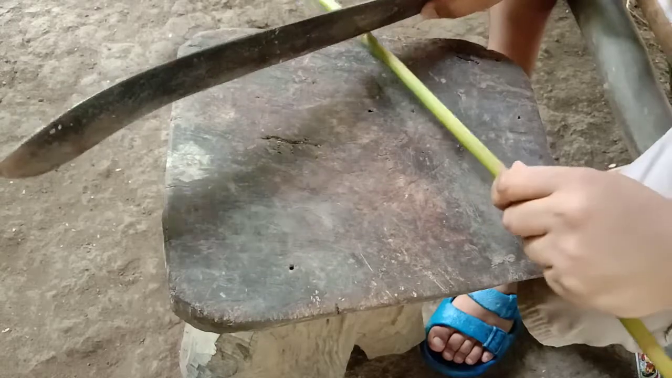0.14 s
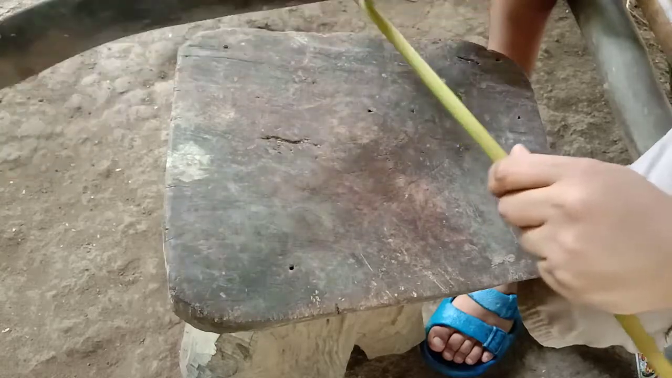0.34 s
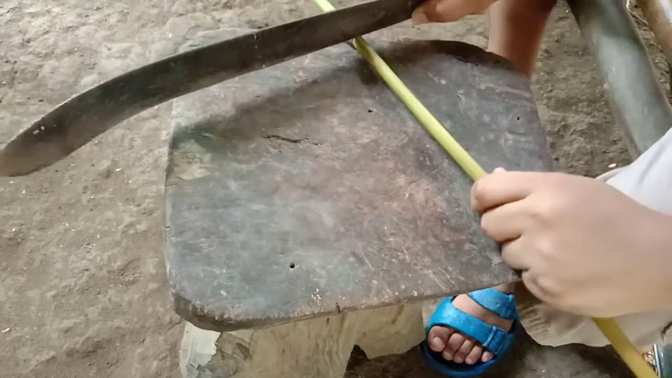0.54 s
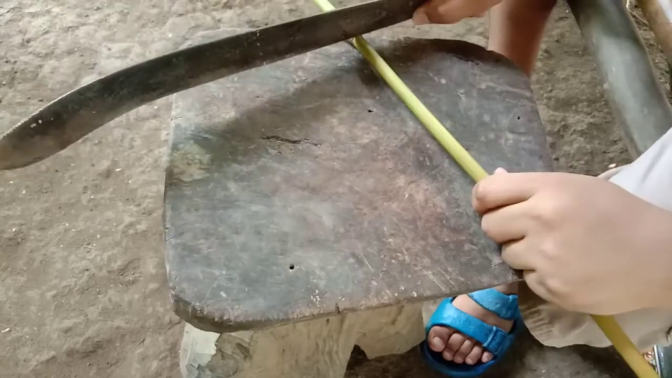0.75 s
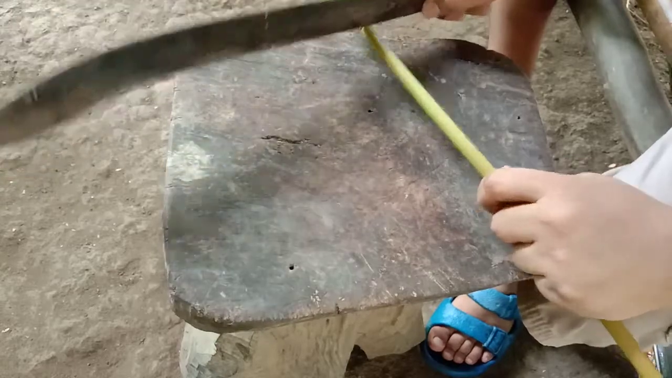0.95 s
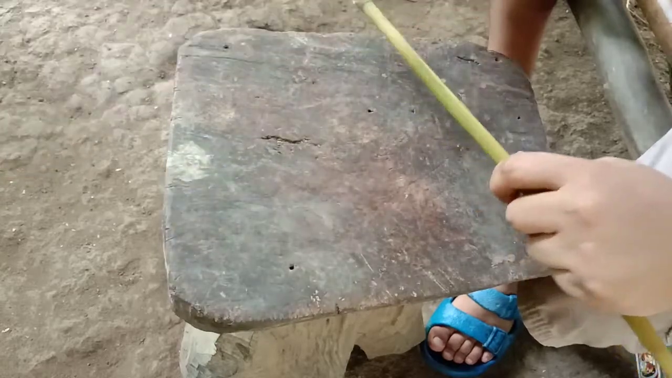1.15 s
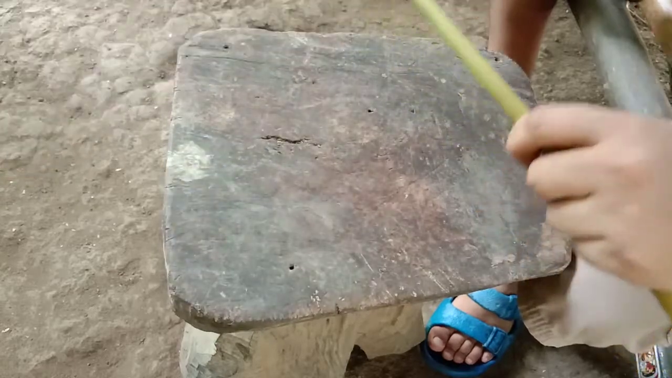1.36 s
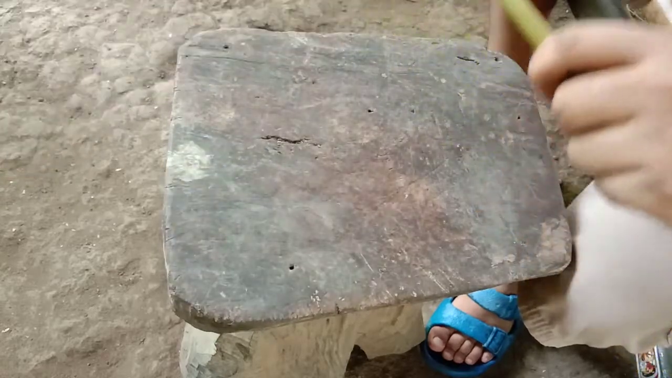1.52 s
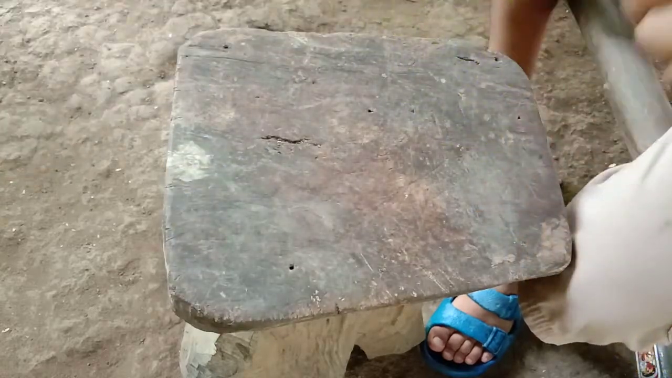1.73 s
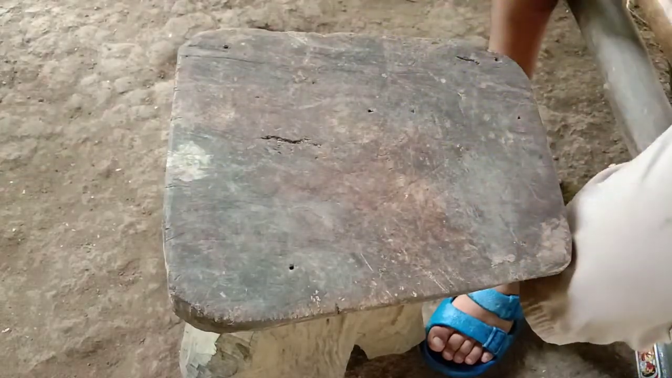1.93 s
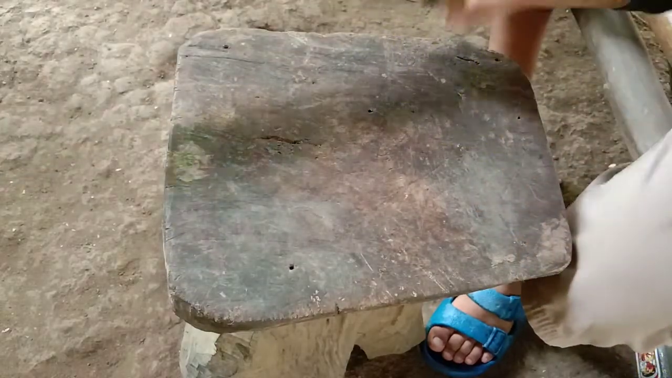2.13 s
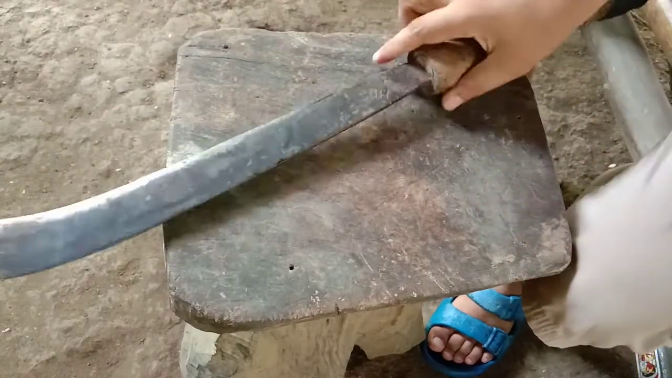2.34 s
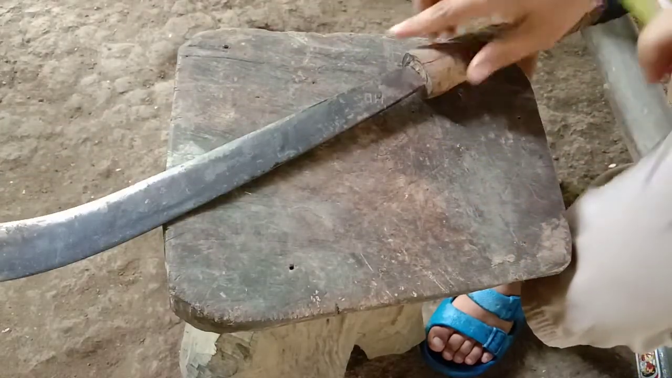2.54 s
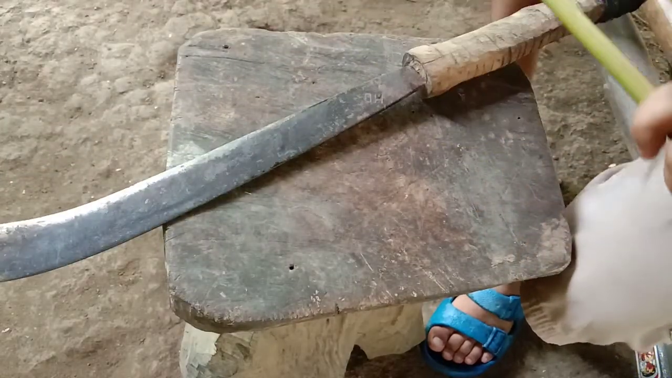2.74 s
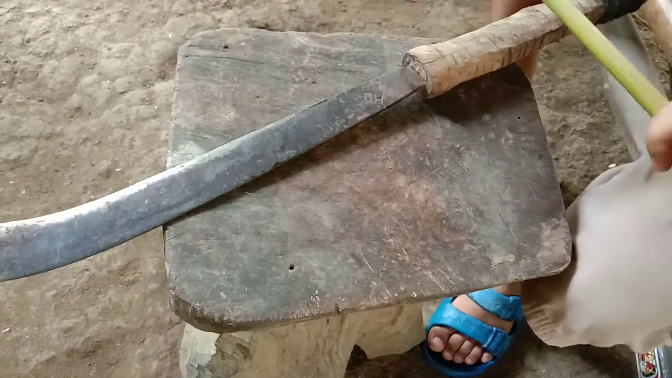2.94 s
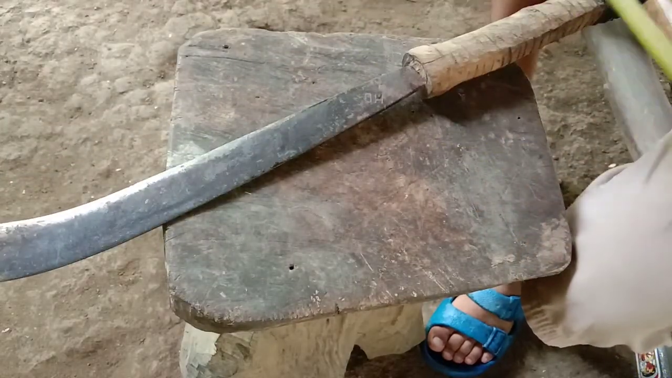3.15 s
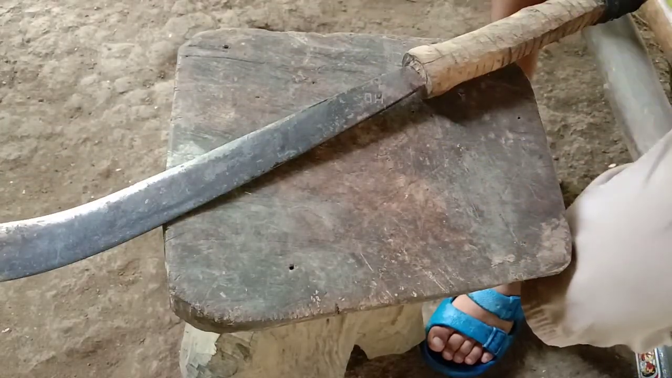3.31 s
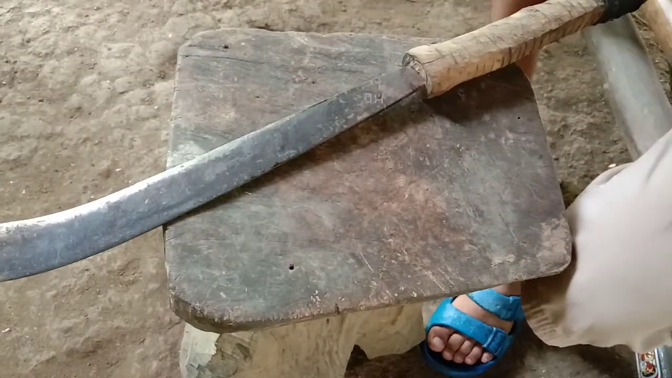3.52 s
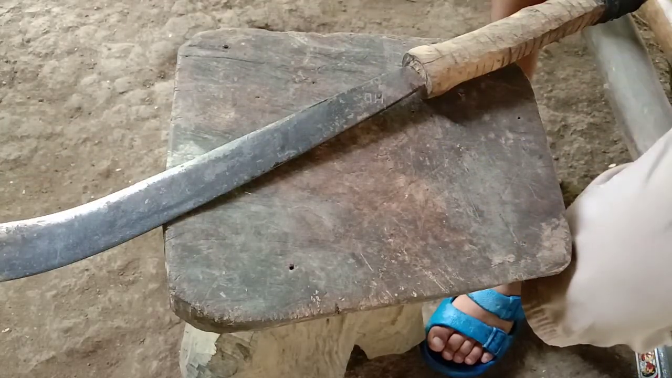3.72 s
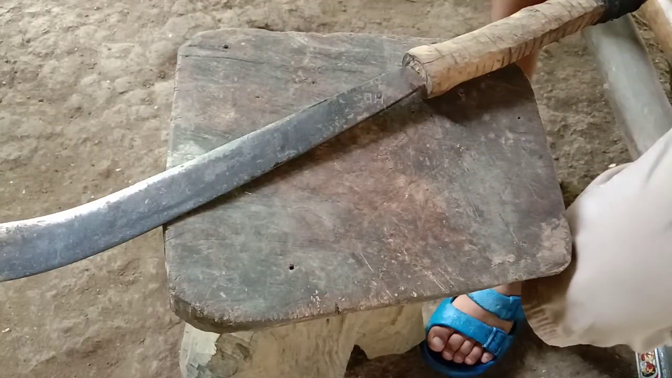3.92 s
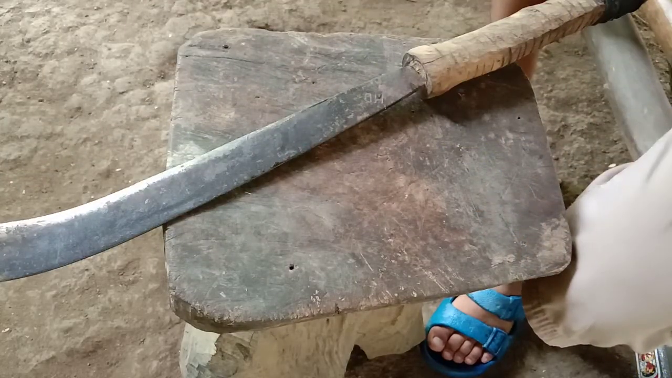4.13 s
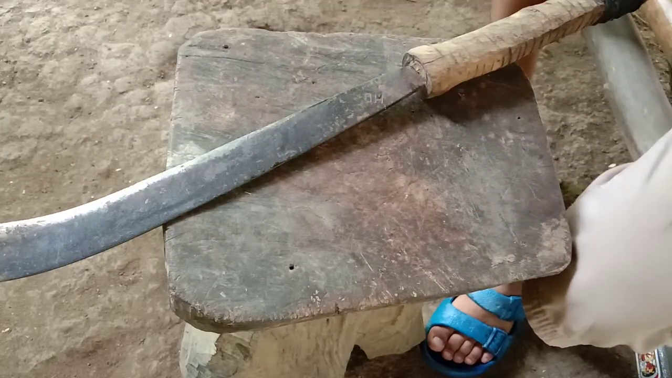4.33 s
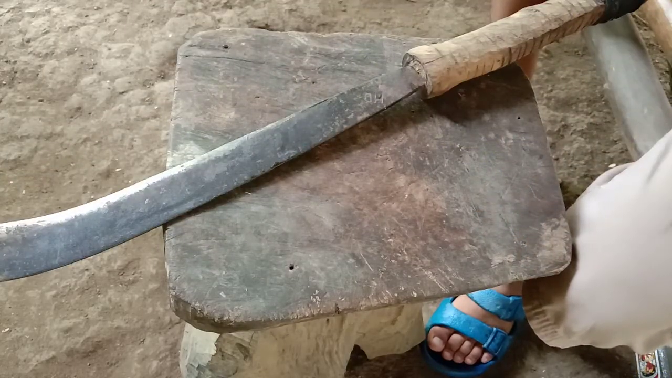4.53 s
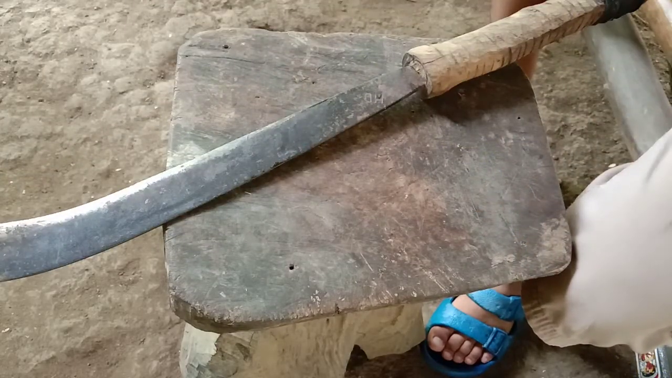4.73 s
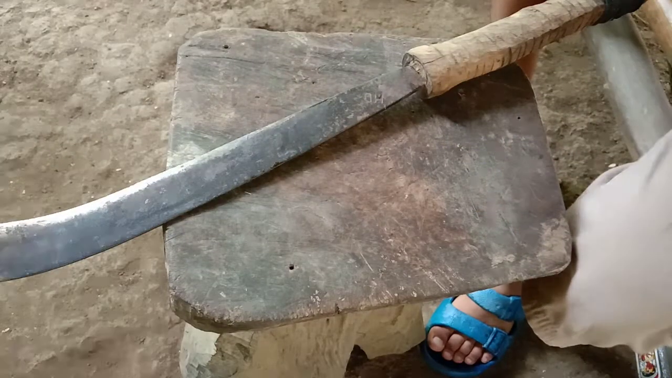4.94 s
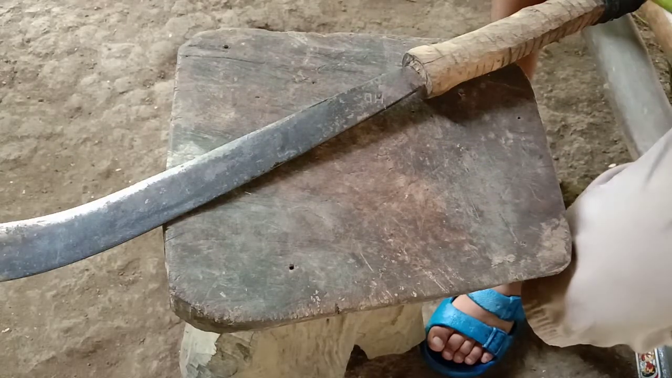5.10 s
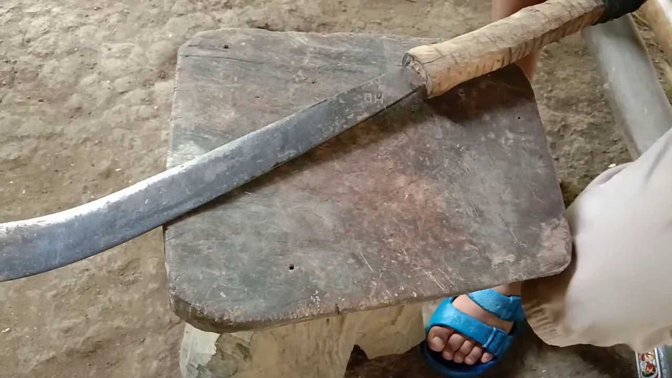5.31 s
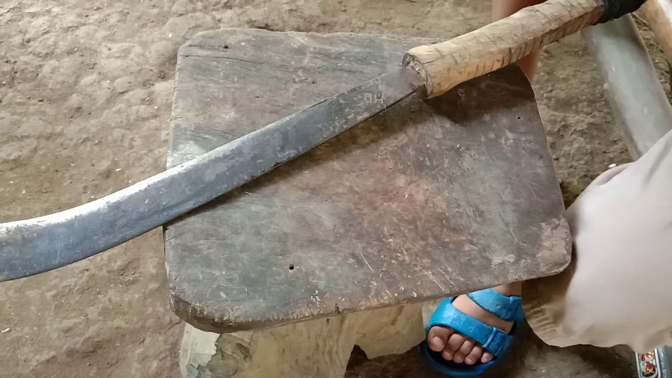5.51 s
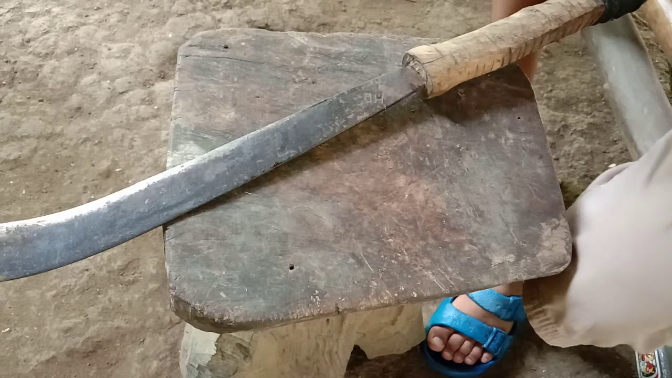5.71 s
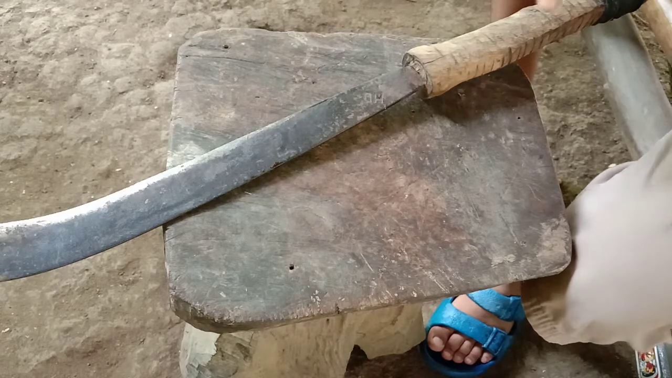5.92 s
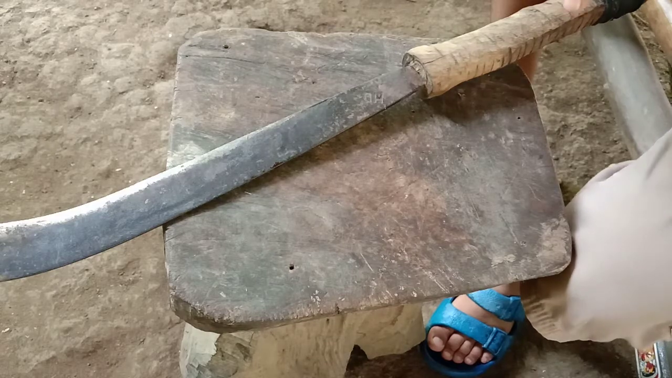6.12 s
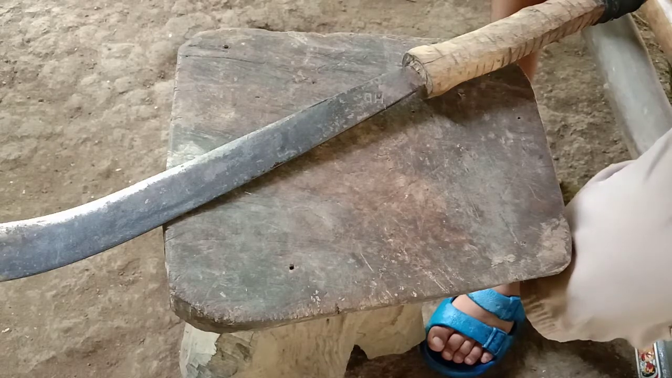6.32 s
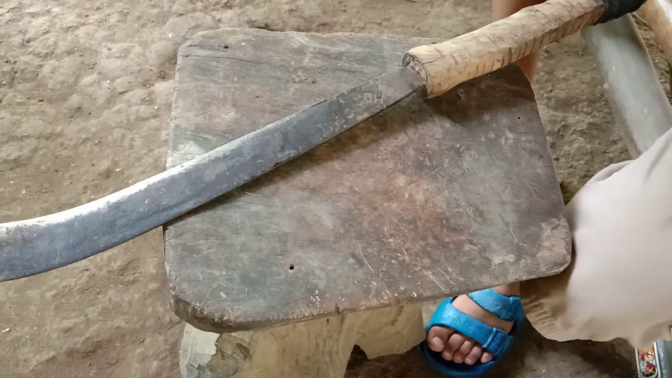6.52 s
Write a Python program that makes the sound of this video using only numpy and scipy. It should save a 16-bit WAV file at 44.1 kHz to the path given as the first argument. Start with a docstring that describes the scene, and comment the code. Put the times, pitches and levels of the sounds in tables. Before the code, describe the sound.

A long steel blade scrapes and chops a green stalk on a wooden stool, clatters down on the seat, then fibres snap.

```python
"""A long steel blade shaves a green bamboo stalk, chops it on a wooden stool, then drops on the seat and rocks.
Steel and wood are banks of decaying sine modes with noise clacks and cracks.
Stalk fibres give pulse ticks, noise-burst snaps and grainy rubbing strokes; nearby surfaces add a short echo.
Behind: a wavering hum, narrow noise bands at 1250 and 7320 Hz and yard air, all shaped noise; faint far sines.
"""
import sys
import numpy as np
from scipy import signal
from scipy.fft import rfft, irfft, next_fast_len
from scipy.io import wavfile
from scipy.ndimage import map_coordinates

SR = 44100
rng = np.random.default_rng(int(sys.argv[2]) if len(sys.argv) > 2 else 0)


def transcribe(signal):
    """Save signal, clipped to [-1, 1], as a 16-bit WAV file at the path in sys.argv[1]."""
    frames = np.atleast_2d(signal).T
    limited = np.clip(frames, -1, 1)
    pcm = np.round(limited * 32767).astype(np.int16)
    wavfile.write(sys.argv[1], SR, pcm)


N = 293706

# hum level: time_s, level_db
HUM_LEVEL = [(0.0, -64), (0.8, -60), (1.82, -61), (1.93, -64), (3.63, -58), (3.73, -62), (4.97, -65.5),
             (5.47, -65), (6.66, -65)]
# hum spectrum: freq_hz, relative_db
HUM_SPECTRUM = [(18, -49), (30, -36), (62, -15), (86, -12), (119, -0.5), (167, -8.5), (244, -20.5),
                (330, -33.5), (430, -64.5), (730, -120)]
# yard air spectrum: freq_hz, relative_db
AIR_SPECTRUM = [(150, -30), (280, 2.5), (600, -1), (1500, -7.5), (5900, -10), (6700, -14.5), (8200, -18),
                (9200, -23), (13500, -25), (14900, -14.5), (16000, -39)]
# faint steady noise, opposite in the two channels: freq_hz, relative_db
SIDE_NOISE_SPECTRUM = [(30, -14), (120, -6), (233, -11), (866, -17), (1250, -7), (1500, -15.5), (5900, -15),
                       (7270, -34.5), (9220, -26), (15500, -21.5), (16000, -59)]
# far notes: start_s, length_s, first_hz, last_hz, level_db
FAR_NOTES = [(2.023, 0.123, 3120, 2920, -68.5), (2.723, 0.04, 930, 970, -64.5),
             (3.393, 0.12, 2980, 2920, -66), (6.132, 0.13, 647, 630, -54.5),
             (6.555, 0.089, 5950, 6300, -67)]
# thin high warble: time_s, pitch_hz
WARBLE_PITCH = [(6.2, 7155), (6.214, 7247), (6.258, 7055), (6.284, 7300), (6.404, 7155), (6.41, 6848),
                (6.424, 6770), (6.52, 7249)]
# echo decay: freq_hz, t60_s
ECHO_DECAY = [(200, .12), (700, .13), (2000, .18), (8000, .15), (16000, .09)]
# strokes along the stalk: loudest_s, level_db, swell_db_per_s, fade_db_per_s, hollow_fizz_share (0-1)
STROKES = [(0.087, -39.5, 105, 117, 0.16), (.96, -70, 152, 56.5, 0.1), (1.035, -69, 203.5, 297, 0),
           (2.1, -69.5, 93.5, 108, 0.3), (3.22, -67.5, 400, 114, .55), (3.46, -70, 190, 53, 0.45),
           (3.96, -73.5, 120, 143, .7), (4.539, -49, 3000, 112, 1), (4.66, -82, 100, 300, .85),
           (4.81, -48.5, 3004, 226, .85), (5.06, -54, 2998.5, 255, 0.57), (5.451, -47, 3000, 452, 0.68),
           (5.555, -61, 900, 500, .85), (5.58, -58.5, 500, 1302, 0.99), (6.06, -68.5, 76, 147.5, 0.5),
           (6.126, -57.5, 298, 700, 0.2)]
# rasp spectrum: freq_hz, relative_db
RASP_SPECTRUM = [(180, -44), (300, -20.5), (730, -10.5), (807, -11), (1230, -8), (2100, -6.5), (2360, -8.5),
                 (5930, 1.5), (10500, -20.5), (13700, -20), (15200, -4.5), (16500, -35.5)]
# hollow stalk, in snap tails and strokes: freq_hz, relative_db
FIZZ_SPECTRUM = [(1500, -40), (2600, -16), (3400, -3), (3900, -18), (4800, -2), (5300, -12), (6000, 1),
                 (6700, -13), (7300, -2), (8300, -17), (13200, -25), (14900, -13), (15800, -22),
                 (16300, -50)]
# fibres snapping: time_s, level_db, treble_tilt_db_per_octave
FIBRE_SNAPS = [(0.407, -16, 14.5), (3.370, -59, -3), (3.388, -56.5, 0), (3.45, -44.5, 2),
               (3.467, -49, -6.5), (3.522, -46, 1), (3.528, -40, 2), (3.535, -39.5, 2.5), (3.592, -40.5, 5),
               (3.617, -38, 4), (3.6508, -39, 5.5), (3.67, -56, 12), (3.680, -41, 5), (3.738, -44, 2),
               (3.8908, -49, -0.5), (3.949, -55, -3.5), (3.964, -53, -2), (4.006, -54, -7.5),
               (4.104, -56, -1), (4.217, -43, 3.5), (4.2983, -43.5, 0.5), (4.412, -48.5, 7),
               (4.481, -42, 9), (4.485, -50, 3), (4.497, -33, 0.5), (4.5222, -27.5, -8.5),
               (4.5262, -26.5, -3.5), (4.5805, -43, 4.5), (4.680, -47, 18), (4.69, -39.5, 11),
               (4.7662, -49, 3.5), (4.795, -51, 0), (4.8, -21.5, 0.8), (4.879, -51, 11), (5.059, -48.5, 1),
               (5.449, -48, 0), (6.061, -61.5, -5.5), (6.1197, -50.5, -1)]
# snap burst spectrum: freq_hz, relative_db
BURST_SPECTRUM = [(590, -16), (1000, -24.5), (2030, -11.5), (2330, -25.5), (2670, -2), (4500, -8.5),
                  (5110, -2), (7410, 3), (8220, -5), (13200, -13), (14800, 1), (15900, -14)]
# dull close bumps: time_s, push_db
DULL_BUMPS = [(4.522, -17)]
# dry ticks, some with an audible second tick: time_s, peak_db, second_tick_loss_db
TICK_EVENTS = [(0.027, -28, 30), (.230, -31.5, 6), (.265, -42.5, 29), (.2805, -33.5, -1.5),
               (.4175, -56, 34), (0.439, -45, 44), (.477, -24, 30), (0.552, -33.5, 4), (.560, -30.5, 2.5),
               (.579, -36, 33), (1.029, -35.5, 10), (1.032, -37.5, 0), (1.44, -35.5, 4.5),
               (1.460, -32, 6.5), (1.756, -38.5, 31), (1.801, -32.5, 3.5), (1.950, -34, 2.5),
               (2.503, -23, 30), (4.641, -35, -3), (4.701, -20, 6), (5.091, -31, 9), (5.161, -27.5, 3),
               (5.329, -41, 31.5)]
# tick spectrum: freq_hz, relative_db
TICK_SPECTRUM = [(150, -32), (400, -4.5), (1700, -10), (2550, 3.5), (2890, -4.5), (6290, -3.5),
                 (8060, -14.5), (12900, -18), (15000, -3.5), (16300, -14), (17000, -43.5)]
# knocks on stool and stalk: time_s, level_db, brightest_octave_re_1khz, narrowness_db_per_octave,
# ring_length_factor, crack_db
KNOCK_EVENTS = [(0.4077, -8, -.86, 43, 1.38, -13.5), (.418, 0.8, .1, 43, 0.15, -21.5),
                (.44, -16.5, .83, 15, 1.2, -27), (.47, -16, -.51, 7, 0.52, -24),
                (0.542, -30, .53, 25, 0.35, -13.5), (.616, -31.5, -.81, 8, 0.68, -25.5),
                (.92, -46.5, .05, 13, 2.1, -15.5), (1.123, -27.5, -1.6, 22, 1.07, -14.5),
                (1.131, -23.5, -.62, 23, 1, -24.5), (1.209, -21.5, 1.01, 3, 0.34, -25.5),
                (1.217, -47, .2, 12, 0.98, -32), (1.616, -37.5, .81, 16, 0.53, -6.5),
                (5.728, -25.5, .31, 70, 1.38, -10), (5.779, -37, .31, 70, 1.25, -13)]
# wood modes: freq_hz, relative_db, t60_s (before the ring length factor)
WOOD_MODES = [(153.8, -8, 0.32), (316.4, 0.5, 0.089), (443, -13.5, 0.34), (555.5, -2, 0.088),
              (747, -7.5, 0.2), (897, -11, 0.28), (946, -3, 0.059), (1168, -8, .12), (1245, -1.5, 0.11),
              (1361, -11, .1), (1740, -16.5, 0.08), (2158, -6, 0.031), (2830, -18, 0.038),
              (2892, -22.5, 0.074), (3590, -10.5, 0.097), (3940, -22, 0.19), (5207, -13.5, 0.082),
              (6070, -7, 0.13), (6350, -16.5, 0.082)]
# splintering crack spectrum: freq_hz, relative_db
CRACK_SPECTRUM = [(120, -43.5), (250, -18), (600, -22.5), (1230, -6), (2000, -19.5), (2500, -19),
                  (3000, -17), (3700, -19.5), (4200, -18.5), (6200, -22.5), (6800, -26), (9000, -36),
                  (13300, -57), (15000, -40), (16300, -61.5)]
# blade landing and rocking on the seat: time_s, level_db, brightest_octave_re_1khz, clack_db, rise_s
LANDINGS = [(2.236, -2.5, 1, -21.5, 0.00076), (2.399, 0, 0.85, -26, 0.0021), (2.405, -5, -0.28, -28, .0011),
            (2.431, -2, 0.025, -40.5, 0.0056), (2.448, -10.5, 0.15, -40.5, 0.00048),
            (2.466, -3.5, -0.44, -43, 0.004), (2.491, -21, -0.97, -46, 0.001),
            (2.508, -20.5, -0.77, -48, 0.0037), (2.537, -27.5, -0.62, -51, 0.0056)]
# steel modes: freq_hz, relative_db, t60_s (before the ring length factor)
STEEL_MODES = [(262, -12, .4), (544.8, -1, 0.35), (557, 5, 0.079), (752, -16.5, 0.26), (872, -20.5, 0.18),
               (909, -13.5, 0.2), (1207, -14.5, 0.28), (1241, 0.5, .15), (1291, -6, 0.18),
               (1545, -31.5, 0.32), (2000, -7.5, .11), (2178, -18, .2), (2560, -30, .15),
               (2738, -21.5, .13), (3180, -26.5, .15), (3320, -22.5, 0.15), (4032, -23, 0.098),
               (4685, -13, 0.3), (5500, -32, .25), (6100, -29, .16), (6480, -26.5, 0.15),
               (7900, -33.5, .12), (13900, -36.5, .12), (14490, -26, .13)]

AIR_DB, SIDE_NOISE_DB = -70.5, -80.5
OCTAVE_DB, OCTAVE_START_S, OCTAVE_END_S = -70.5, 0.5, 4.45
MID_BAND_DB, HISS_BAND_DB, WARBLE_DB = -75.5, -75, -62
MID_SWELL_S, MID_WIDTH_S, MID_RISE_DB = 3.14, 0.3, 9.7
BODY_DB, EDGE_DB = -14, -15.5  # narrow rasp bands at 1250 and 7320 Hz
TAIL_DB, TAIL_T60_S = -17, 0.13  # grainy tail after a snap
TEAR_START_S, TEAR_END_S, SMALL_COUNT, SMALL_MIN_DB = 3.2, 3.75, 12, -59  # random small snaps
ANSWER_S, LEAN_DB = 0.0098, 1  # wait for the second tick; side level of a tick
CRACK_T60_S = 0.078
FLIGHT_S, ROCK_S = 0.18, 0.026  # free ring after the first landing, after each rock
STEEL_ROUGH, WOOD_ROUGH = 4, 5.5  # phase drift, rad per root second
LOW_HZ, TOP_HZ = 40, 16785


def amp(db):
    """Decibels to amplitude."""
    return 10 ** (np.asarray(db) / 20)


def unit(x):
    """Scale to rms 1."""
    return x / np.sqrt(np.mean(x ** 2) + 1e-20)


def along(points, hz):
    """Interpolate (freq_hz, value) points on a log frequency axis."""
    f, v = np.transpose(points)
    return np.interp(np.log(hz + 1), np.log(f + 1), v)


def curve(rows):
    """One value per sample from (time_s, value) rows."""
    s, values = np.transpose(rows)
    return np.interp(np.arange(N) / SR, s, values)


def span(start_s, length_s, edge_s):
    """Gate of 1 with soft edges inside its length."""
    t = np.arange(N) / SR - start_s
    return np.sin(np.pi / 2 * np.clip(np.minimum(t, length_s - t) / edge_s, 0, 1)) ** 2


def wobble(rate_hz):
    """Smooth random curve, rate_hz knots a second."""
    knots = rng.standard_normal(int(N * rate_hz / SR) + 4)
    return map_coordinates(knots, [np.arange(N) * rate_hz / SR])


def filtered(x, response):
    """Multiply the spectrum of x by a response of frequency."""
    m = next_fast_len(x.shape[-1] + 8192)
    return irfft(rfft(x, m) * response(np.fft.rfftfreq(m, 1 / SR)), m)[..., :x.shape[-1]]


def noise(spectrum, size=N, tilt_db=0, grain_db=0):
    """Coloured noise, rms 1, tilted about 6 kHz; grains are 1 ms steps of random strength before the colour."""
    steps = np.repeat(rng.standard_normal(size // 44 + 1), 44)[:size]
    grains = amp(grain_db * steps)
    colour = lambda hz: amp(along(spectrum, hz) + tilt_db * np.log2((hz + 50) / 6000))
    return unit(filtered(grains * rng.standard_normal(size), colour))


def band(hz, width_hz):
    """Noise through one narrow resonance, rms 1."""
    return unit(filtered(rng.standard_normal(N), lambda f: 1 / (1 + ((f - hz) / width_hz) ** 2)))


def pulse(spectrum, size=1024):
    """Minimum-phase pulse with this spectrum, peak 1."""
    magnitude = amp(along(spectrum, np.fft.rfftfreq(size, 1 / SR)))
    cepstrum = irfft(np.log(np.maximum(magnitude, 1e-4)))
    cepstrum[1:size // 2] *= 2
    cepstrum[size // 2 + 1:] = 0
    p = irfft(np.exp(rfft(cepstrum)))[:size // 2]
    return p / np.abs(p).max()


def add(track, s, sound):
    """Mix a sound in at time s."""
    track[round(s * SR):][:len(sound)] += sound


def ring(modes, t, bright, fall_db, length, rise_s, reach_db, bend, rough):
    """Decaying modes, one row each: loudest near the brightest octave, with drifting phase.
    The dB fade bends with time; modes above 1320 Hz start at random phase."""
    hz, db, t60_s = np.transpose(modes)[:, :, None]
    octaves_off = np.abs(np.log2(hz / 1000) - bright)
    db = db - np.minimum(fall_db * octaves_off, reach_db)
    start = 2 * np.pi * rng.random(hz.shape) * (hz > 1320)
    steps = np.repeat(rng.standard_normal((len(hz), len(t) // 64 + 1)), 64, axis=1)[:, :len(t)]
    drift = rough * np.cumsum(steps, axis=1) * np.sqrt(64 * SR) / (64 * SR)
    fade = amp(db - 60 * (t / (t60_s * length)) ** bend) * (1 - np.exp(-t / rise_s))
    return fade * np.sin(2 * np.pi * hz * t + start + drift) / amp(db).sum()


def yard():
    """Noise bands: lumpy hum, its fuzzy octave, a low-mid band that swells once, a thin hiss band and air."""
    hum = amp(curve(HUM_LEVEL) + 3 * wobble(12)) * unit(noise(HUM_SPECTRUM) + 0.44 * band(120, 6.5))
    octave_gate = span(OCTAVE_START_S, OCTAVE_END_S - OCTAVE_START_S, 0.073)
    octave = amp(OCTAVE_DB) * octave_gate * band(239, 5.2)
    swell_db = MID_RISE_DB * np.exp(-((np.arange(N) / SR - MID_SWELL_S) / MID_WIDTH_S) ** 2)
    mid_band = amp(MID_BAND_DB + swell_db + 1.5 * wobble(1.8) + 1.9 * wobble(8.8)) * band(1250, 55)
    shimmer_db = 1.5 * wobble(2.5) + 2.5 * wobble(40)
    hiss_band = amp(HISS_BAND_DB + shimmer_db) * band(7320, 95)
    air = amp(AIR_DB + 0.56 * wobble(38) + 0.8 * wobble(0.72)) * noise(AIR_SPECTRUM)
    return hum + octave + mid_band + hiss_band + air


def notes():
    """Thin far sines that waver in pitch and strength; high ones flutter most in strength."""
    out, t = np.zeros(N), np.arange(N) / SR
    flutter, waver = wobble(45), wobble(150)
    tones = []
    for s, length_s, first_hz, last_hz, db in FAR_NOTES:
        glide_hz = np.interp(t, [s, s + length_s], [first_hz, last_hz])
        tones.append((glide_hz, amp(db) * span(s, length_s, 0.41 * length_s)))
    start_s, end_s = WARBLE_PITCH[0][0], WARBLE_PITCH[-1][0]
    tones.append((curve(WARBLE_PITCH), amp(WARBLE_DB) * span(start_s, end_s - start_s, 0.013)))
    for hz, gain in tones:
        strength = gain * amp(0.66 * hz / 1000 * flutter)
        out += strength * np.sin(2 * np.pi * np.cumsum(hz * (1 + 0.0049 * waver)) / SR)
    return out


def shed(x):
    """Two-channel echo of nearby surfaces: delayed noise whose bands decay at their own rates."""
    hz, t, z = signal.stft(rng.standard_normal((2, SR // 3)), SR, nperseg=256)
    decay = amp(-60 * t / along(ECHO_DECAY, hz)[:, None])
    tail = signal.istft(z * decay, SR, nperseg=256)[1]
    delayed = np.pad(x, (300, 0))[None]
    return signal.fftconvolve(delayed, tail / np.linalg.norm(tail[0]), axes=1)[:, :N]


def rubbing():
    """Steel and fingers slide on the stalk's skin: a grainy rasp, or a crackle that wakes its hollow."""
    rasp = noise(RASP_SPECTRUM, grain_db=2.0) + amp(BODY_DB) * band(1250, 55) + amp(EDGE_DB) * band(7320, 95)
    rasp = unit(amp(0.81 * wobble(38)) * rasp)
    fizz = unit(amp(3.2 * wobble(57)) * noise(FIZZ_SPECTRUM, grain_db=7))
    out, t = np.zeros(N), np.arange(N) / SR
    for s, db, swell, fade, hollow in STROKES:
        hollow = np.clip(hollow, 0, 1)
        stroke = amp(db - np.maximum(swell * (s - t), fade * (t - s)))
        out += stroke * (np.sqrt(1 - hollow) * rasp + np.sqrt(hollow) * fizz)
    return out


def fibres():
    """Fibres snap as a short noise burst with a grainy tail; a bump is one low push."""
    out, t = np.zeros(N + SR), np.arange(SR // 6) / SR
    small = [(TEAR_START_S + (TEAR_END_S - TEAR_START_S) * u, SMALL_MIN_DB + 6 * v, -7 * w)
             for u, v, w in rng.random((SMALL_COUNT, 3))]
    shape = t / 0.0021 * np.exp(1 - t / 0.0015)
    for s, db, tilt_db in FIBRE_SNAPS + small:
        burst = shape * noise(BURST_SPECTRUM, len(t), tilt_db)
        tail = amp(TAIL_DB - 60 * t / TAIL_T60_S) * noise(FIZZ_SPECTRUM, len(t), tilt_db, grain_db=1.5)
        add(out, s - 0.0005, amp(db) * (burst + tail))
    for s, db in DULL_BUMPS:
        u = t / 0.0011
        add(out, s, -amp(db) * u * (1 - u / 2) * np.exp(-u))
    return out[:N]


def ticks():
    """Dry close pulses, some with an audible second about 10 ms later, leaning aside: (middle, side)."""
    out, spike = np.zeros((2, N + SR)), -pulse(TICK_SPECTRUM)
    for (s, db, loss_db), leans in zip(TICK_EVENTS, rng.uniform(-1.1, 1, (len(TICK_EVENTS), 2))):
        for at, level_db, lean in zip([s, s + ANSWER_S], [db, db - loss_db], leans):
            add(out[0], at, amp(level_db) * spike)
            add(out[1], at, amp(level_db + LEAN_DB) * lean * spike)
    return out[:, :N]


def stool():
    """Each knock rings the wood's modes and cracks the stalk as grainy noise."""
    out, t = np.zeros(N + SR), np.arange(SR // 4) / SR
    for s, db, bright, fall_db, length, crack_db in KNOCK_EVENTS:
        crack_env = amp(crack_db - 60 * t / CRACK_T60_S) * (1 - np.exp(-t / 0.00034))
        crack = crack_env * noise(CRACK_SPECTRUM, len(t), grain_db=5.0)
        modes = ring(WOOD_MODES, t, bright, fall_db, length, 0.0009, reach_db=22.0, bend=0.99, rough=WOOD_ROUGH)
        add(out, s, amp(db) * (modes.sum(0) + crack))
    return out[:N]


def blade():
    """Each landing rings the steel until it presses on the seat, which chokes the lowest modes most."""
    out, t = np.zeros(N + SR), np.arange(SR // 3) / SR
    mode_hz = np.array(STEEL_MODES)[:, :1]
    choke_db = along([(500, -25.5), (1300, -20.0), (2500, -7.5), (5000, -15)], mode_hz)
    clack_spectrum = [(150, -39.5), (400, -12.5), (1500, 2.0), (6000, -7.0), (8000, -27.5), (16000, -51.5)]
    for k, (s, db, bright, clack_db, rise_s) in enumerate(LANDINGS):
        free_s = ROCK_S if k else FLIGHT_S
        pressed = 1 / (1 + np.exp(np.clip((free_s - t) / (0.12 * free_s), -30, 30)))
        modes = ring(STEEL_MODES, t, bright, 7.3, 0.83, rise_s, reach_db=40, bend=0.98, rough=STEEL_ROUGH)
        tone = (modes * amp(choke_db * pressed)).sum(0)
        clack = amp(clack_db - 60 * t / 0.042) * noise(clack_spectrum, len(t))
        add(out, s, amp(db) * (tone + clack))
    return out[:N]


def scene():
    """Mix in the middle; only ticks, echo and a faint steady noise differ between the sides."""
    tick, tick_side = ticks()
    knocks = blade() + stool()
    stalk = fibres() + rubbing() + tick
    knock_echo, stalk_echo = shed(knocks), shed(stalk)
    mid = knocks + stalk + amp(-9.5) * knock_echo[0] + amp(-19) * stalk_echo[0] + yard() + notes()
    side_echo = amp(-54) * knock_echo[1] + amp(-40) * stalk_echo[1]
    side = tick_side + side_echo + amp(SIDE_NOISE_DB) * noise(SIDE_NOISE_SPECTRUM)
    return np.array([mid + side, mid - side])


def record(dry):
    """Second-order high-pass at LOW_HZ and a soft 500 Hz edge down to silence at TOP_HZ."""
    edge = lambda hz: np.sin(np.pi / 2 * np.clip((TOP_HZ - hz) / 500, 0, 1)) ** 2
    return filtered(dry, lambda hz: (1j * hz / (LOW_HZ + 1j * hz)) ** 2 * edge(hz))


dry = scene()
out = record(dry)
transcribe(out)
```